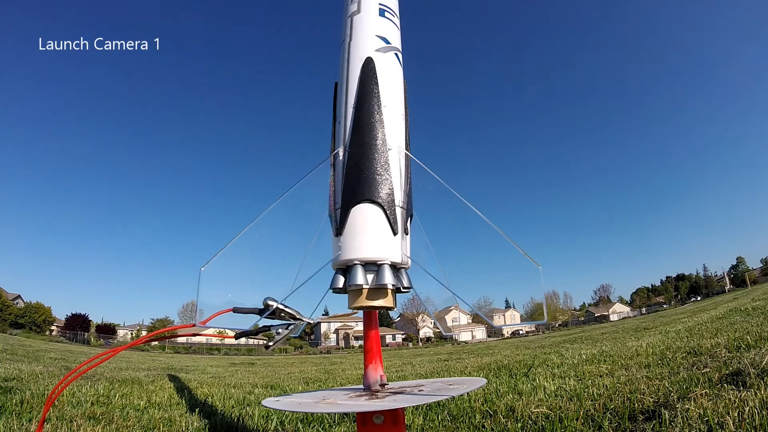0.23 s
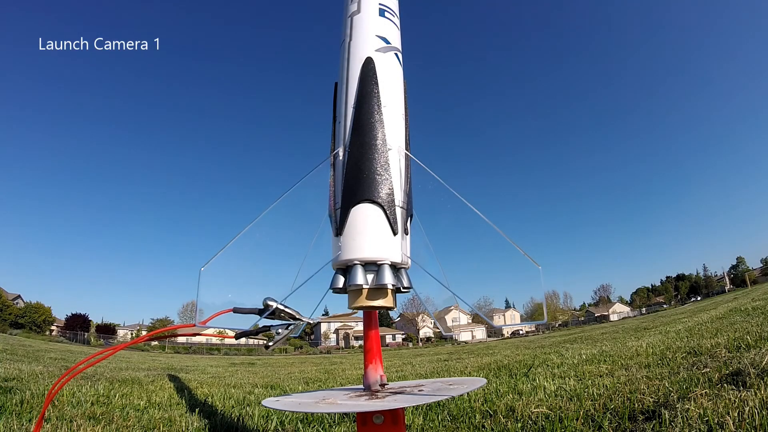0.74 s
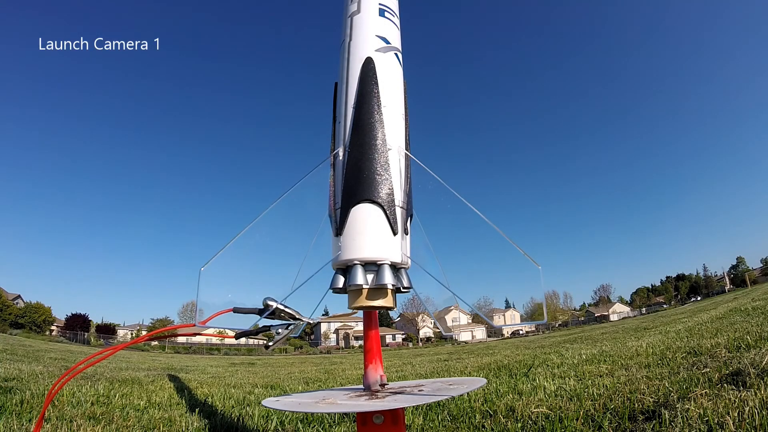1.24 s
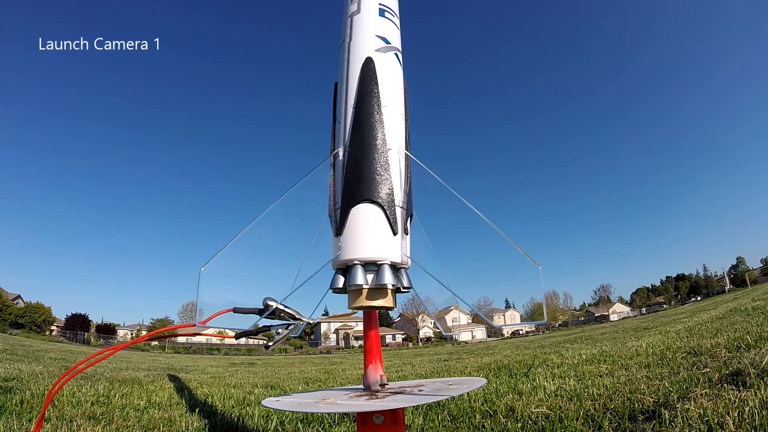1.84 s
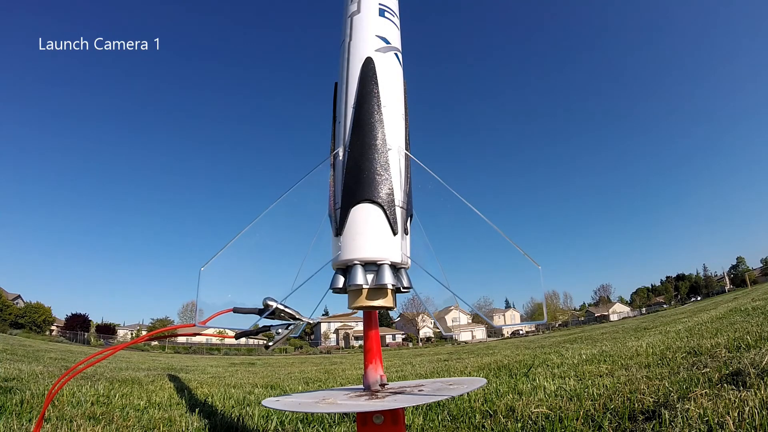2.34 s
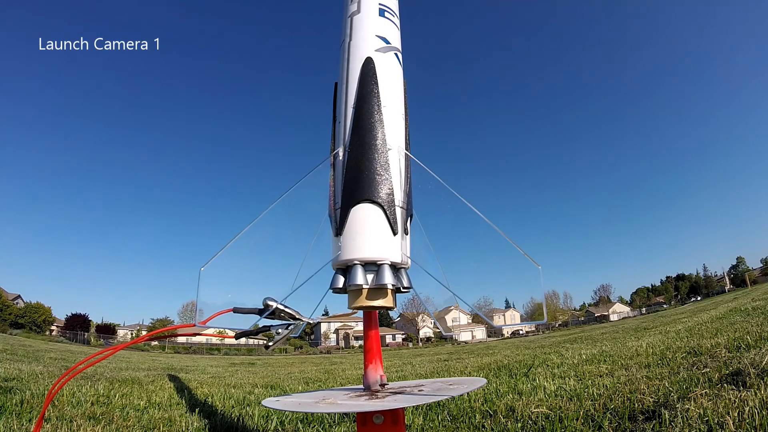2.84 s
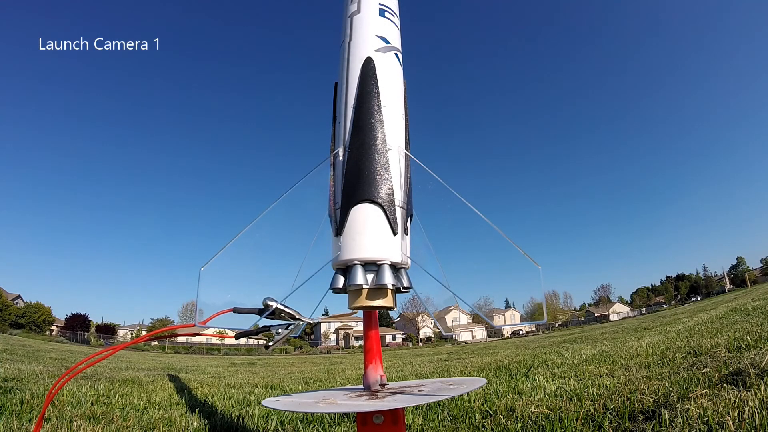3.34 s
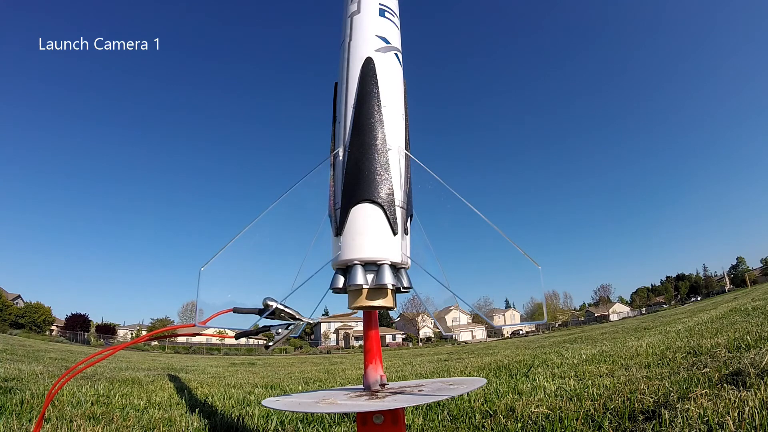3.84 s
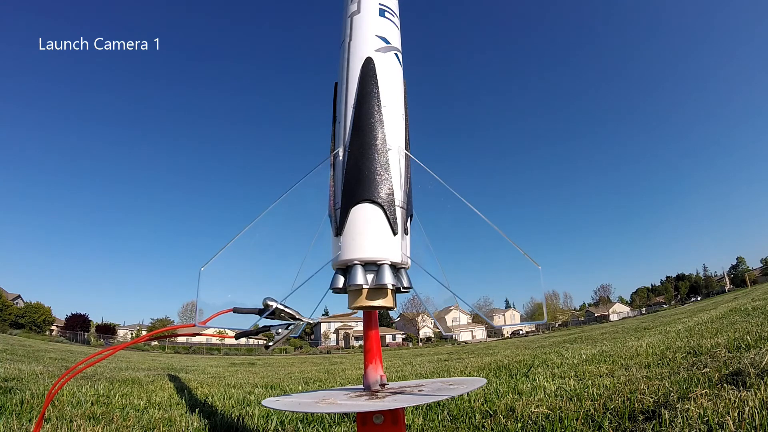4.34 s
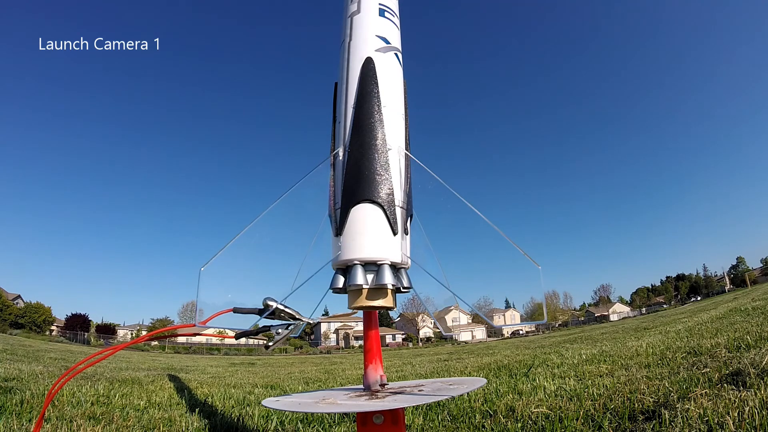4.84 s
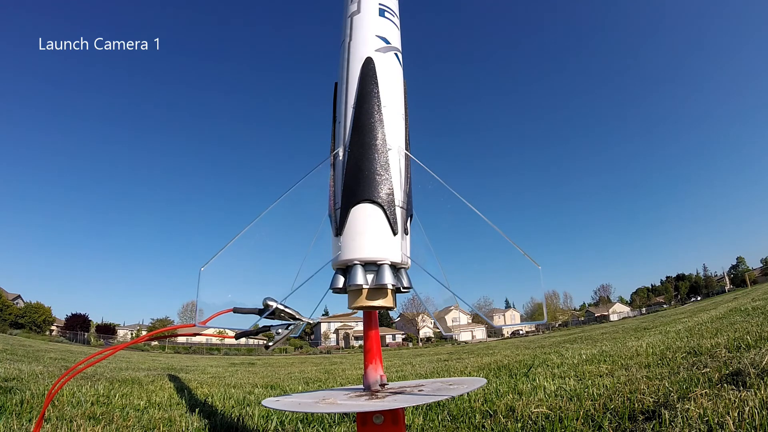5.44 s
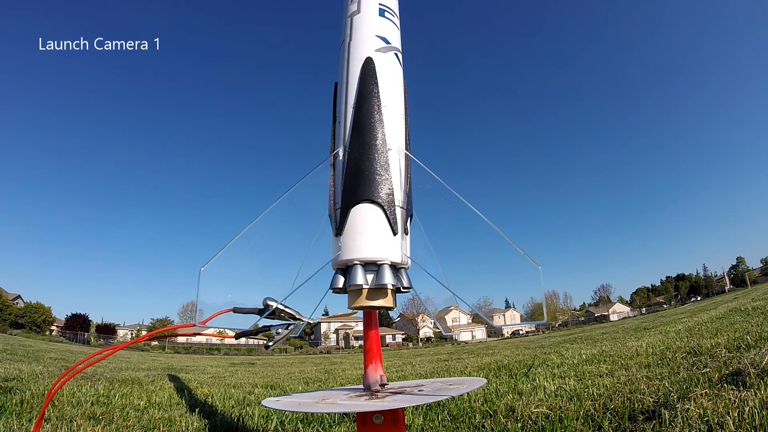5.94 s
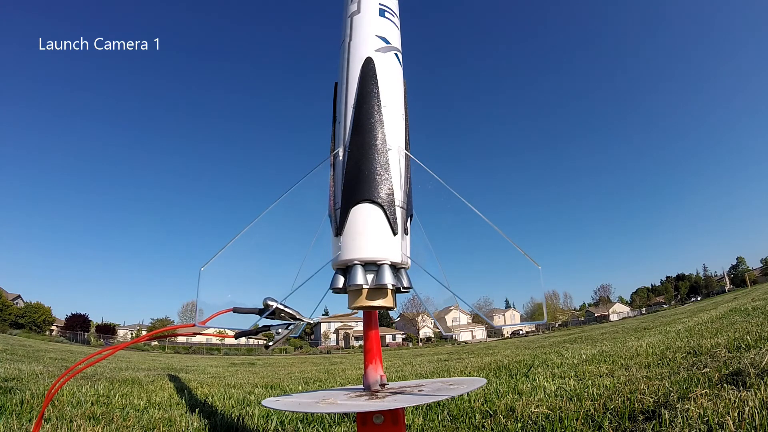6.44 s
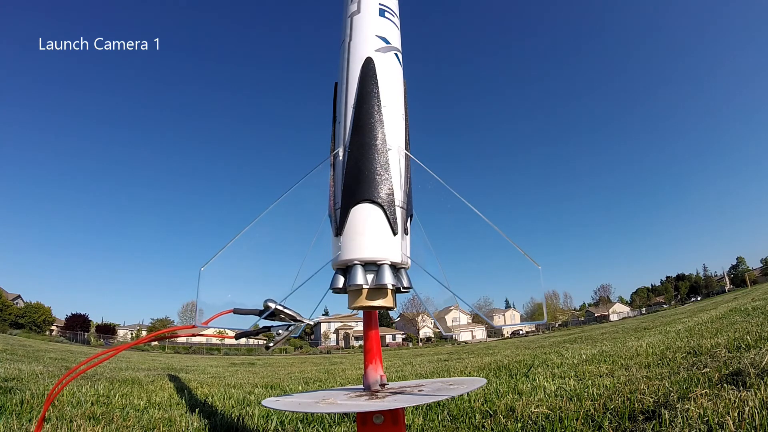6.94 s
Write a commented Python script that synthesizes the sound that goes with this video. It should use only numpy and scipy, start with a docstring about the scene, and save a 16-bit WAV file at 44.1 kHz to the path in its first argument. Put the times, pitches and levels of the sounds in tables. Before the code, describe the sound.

A quiet, steady low town rumble and a faint high hiss fill a park throughout. From about 0.7 seconds a small bird nearby whistles a high two-part song once a second, six times in all: a short arched note, then a falling warble or slur, with the last two songs louder. Farther birds give soft, slightly echoing chirps all along, with a few lilting notes between 2.3 and 3.6 seconds and three rising buzzes between 4.2 and 5.9 seconds. Just before 6 seconds a model rocket's igniter starts to fizz faintly, then catches. Its bright sizzle swells to a peak around 6.5 seconds, louder than the birds. Sharp spits of sparks, the loudest sounds, cluster between 6.5 and 6.9 seconds, while the sizzle thins to a grainy sputter that keeps spitting until the end, just after 7 seconds.

```python
"""A low town rumble and a faint hiss lie behind small birds in a park, where a model rocket waits on its pad.
A near bird whistles a two-part song about once a second; farther ones chirp and buzz among the trees.
Each call is a near-pure tone, modulated in pitch and level. At about six seconds the igniter catches:
sparks, each an impulse ringing between nozzle and pad, merge into a sizzle that swells and then
thins out among sharp spits. One microphone hears it all."""
import sys
import numpy as np
from scipy import signal
from scipy.fft import rfft, irfft
from scipy.io import wavfile
from scipy.ndimage import uniform_filter1d

SR = 44100
rng = np.random.default_rng(int(sys.argv[2]) if len(sys.argv) > 2 else 0)


def bounce(signal):
    """Save signal as a 16-bit WAV file at the path given by the first command-line argument."""
    frames = np.transpose(np.atleast_2d(signal))
    limited = np.clip(frames, -1, 1)
    pcm = np.round(limited * 32767).astype(np.int16)
    wavfile.write(sys.argv[1], SR, pcm)


N = 316638
TIME = np.arange(N) / SR
CATCH_S, SMOULDER_S = 6.023, .17   # when the igniter catches; how long it fizzes beforehand


def from_db(db):
    """Amplitude grows tenfold for every 20 decibels."""
    return 10 ** (np.asarray(db) / 20)


def rms_one(x):
    """Dividing by the root mean square gives unit power."""
    return x / np.sqrt(np.mean(x ** 2) + 1e-20)


def add(out, start_s, sound):
    """Superposition: a sound adds to the mix from its starting time."""
    at = max(round(start_s * SR), 0)
    out[at:at + len(sound)] += sound[:max(N - at, 0)]


def drift(corner_hz):
    """Low-passed noise wanders at random with an rms of one."""
    hz = np.arange(N // 2 + 1) * SR / N
    return rms_one(irfft(rfft(rng.standard_normal(N)) / (1 + (hz / corner_hz) ** 2), N))


def coloured_noise(spectrum):
    """Spectral shaping: white noise takes the given contour, rolling off past both ends; rms one."""
    hz = np.arange(1, N // 2 + 2) * SR / N
    knots_hz, level_db = np.transpose(spectrum)
    roll_off = np.minimum(hz / knots_hz[0], 1) ** 2 * np.minimum(knots_hz[-1] / hz, 1) ** 2
    gain = roll_off * from_db(np.interp(np.log(hz), np.log(knots_hz), level_db))
    return rms_one(irfft(rfft(rng.standard_normal(N)) * gain, N))


def background(settled_db=-50, ease_db=1, ease_s=1.1, hiss_db=-62.5, hum_waver_db=2, wander_rad=.45):
    """Broadband rumble and hiss lie under two machine hums, slowly modulated in level and phase."""
    # spectrum of the town rumble: frequency_hz, relative_density_db
    rumble = [(20, -24), (32, -21.5), (48, -25), (80, -27.5), (108, -26.5), (122, -21.5), (138, -2.5),
              (160, -0.5), (205, -4.5), (300, -11), (430, -17), (800, -21), (2500, -28.5), (4200, -41)]
    # spectrum of the high hiss in the air: frequency_hz, relative_density_db
    air = [(3000, -22), (4500, -15.5), (5900, -6), (6400, 2.5), (8500, 1.5), (10000, -1.5), (11500, -6),
           (15000, -11)]
    # tones of distant machinery: pitch_hz, rms_db
    hums = [(60, -77), (484, -74.5)]
    rumble_db = settled_db + ease_db * np.exp(-TIME / ease_s)
    out = from_db(rumble_db) * coloured_noise(rumble) + from_db(hiss_db) * coloured_noise(air)
    for hz, rms_db in hums:
        phase = 2 * np.pi * hz * TIME + wander_rad * drift(2.2)
        out += np.sqrt(2) * from_db(rms_db + hum_waver_db * drift(2.9)) * np.sin(phase)
    return out


def park(x, wet_db, t60_s):
    """Reverberation: trees and houses scatter sound into a thin, exponentially decaying tail."""
    t = TIME[:SR // 2]
    echoes = rng.standard_normal(len(t)) * from_db(-60 * t / t60_s) * (t > .01)
    return x + from_db(wet_db) * signal.fftconvolve(x, echoes / np.linalg.norm(echoes))[:N]


def whistle(hz, level_db, waver, flicker_db=1.2):
    """A bird's near-pure tone: phase is the integral of frequency, and pitch and level waver a little."""
    jitter, flicker = (rms_one(uniform_filter1d(row, 330)) for row in rng.standard_normal((2, len(hz))))
    phase = 2 * np.pi * np.cumsum(hz * (1 + waver * jitter)) / SR
    envelope = from_db(level_db + flicker_db * flicker) * signal.windows.tukey(len(hz), .1)
    return np.sqrt(2) * envelope * np.sin(phase)


def sing(shape, notes, waver, scallops_per_s=0, dip_db=0):
    """Notes share one contour; in a warble, modulation bends the pitch in arcs with level dips between."""
    out = np.zeros(N)
    length_share, *columns = np.transpose(shape)
    for start_s, length_s, level_db in notes:
        t = np.arange(round(length_s * SR)) / SR
        hz, shape_db, depth_hz = (np.interp(t / length_s, length_share, column) for column in columns)
        trough = 1 - np.abs(np.sin(np.pi * scallops_per_s * t))
        add(out, start_s, whistle(hz - depth_hz * trough, level_db + shape_db - dip_db * trough, waver))
    return out


def chirps(edge_db=9):
    """Frequency glides: each short call follows a parabola in pitch and is loudest in the middle."""
    # single chirps: start_s, length_s, first_hz, middle_hz, last_hz, level_db
    calls = [(0.191, 0.024, 2520, 2360, 2400, -61), (.407, 0.045, 3230, 2610, 3080, -59),
             (0.486, 0.027, 2610, 2700, 2900, -64), (0.578, 0.033, 2610, 2130, 2100, -61),
             (.798, .027, 3030, 2700, 2400, -60.5), (.98, 0.047, 2660, 2290, 2150, -65),
             (1.175, 0.032, 3100, 2550, 2560, -62), (1.445, .04, 2320, 2210, 2220, -66),
             (1.448, .05, 3700, 4300, 3900, -75), (1.478, .025, 3650, 3480, 3250, -70),
             (1.691, 0.053, 2130, 2075, 2150, -66), (2.068, .018, 3400, 4600, 6200, -69),
             (2.819, .039, 3210, 2870, 2590, -61), (2.933, 0.037, 3990, 3580, 3400, -66),
             (4.168, .064, 3530, 3460, 3310, -61), (4.439, 0.087, 4550, 3910, 3360, -57.5),
             (4.53, .06, 4200, 3900, 3750, -73), (4.888, .053, 2730, 2255, 2380, -61.5),
             (5.47, .062, 2600, 2300, 2390, -58.5), (5.987, 0.096, 2360, 2500, 2700, -64),
             (6.152, 0.034, 3210, 2750, 2030, -60), (6.514, 0.091, 2480, 2600, 2720, -64)]
    out = np.zeros(N)
    for start_s, length_s, *pitches_hz, level_db in calls:
        position = np.linspace(-1, 1, round(length_s * SR))
        hz = np.polyval(np.polyfit([-1, 0, 1], pitches_hz, 2), position)
        add(out, start_s, whistle(hz, level_db - edge_db * position ** 2, waver=.012, flicker_db=3))
    return out


def buzzes(gap_db=19, scatter=.028, uneven_db=2, base_s=.0115, sweep_hz_per_s=105000, first_share=.204):
    """Sawtooth frequency modulation: downward flicks climb and swell, coming slower as they widen."""
    # buzzing climbs: start_s, length_s, first_hz, last_hz, final_db, swell_db, final_sweep_hz
    climbs = [(4.245, 0.2, 4120, 4880, -58.5, 12, 497), (4.944, 0.27, 2466, 3830, -57, 5.5, 1150),
              (5.564, .29, 2660, 4150, -57, 5, 1110)]
    out = np.zeros(N)
    for start_s, length_s, first_hz, last_hz, final_db, swell_db, final_sweep_hz in climbs:
        progress = np.linspace(0, 1, round(length_s * SR))
        centre_hz = first_hz + (last_hz - first_hz) * np.sin(np.pi * progress / 2) ** 2
        sweep_hz = final_sweep_hz * (first_share + (1 - first_share) * progress)
        period_s = base_s + sweep_hz / sweep_hz_per_s
        flick, within = np.divmod(np.cumsum(1 / period_s) / SR, 1)
        detune, accent = rng.standard_normal((64, 2))[flick.astype(int)].T
        hz = centre_hz * (1 + scatter * detune) + sweep_hz * (.5 - within)
        crest_db = final_db - swell_db * (1 - progress) + uneven_db * accent
        add(out, start_s, whistle(hz, crest_db - gap_db * np.cos(np.pi * within) ** 2, waver=.0145))
    return out


def far_birds():
    """Distance raises the share of reverberant sound in the lilts, chirps and buzzes."""
    # a rising and falling note: length_share, pitch_hz, relative_db, scallop_depth_hz
    lilt = [(0, 2386, -8, 0), (.27, 2520, -2.5, 0.004), (.45, 3040, -5, 0), (.74, 3450, -6, 0),
            (1, 2660, -6, 0)]
    # its repeats: start_s, length_s, level_db
    lilts = [(2.306, 0.12, -61), (2.729, 0.11, -63), (2.955, 0.12, -60.5), (3.21, .125, -62.5),
             (3.491, 0.12, -65)]
    return park(sing(lilt, lilts, waver=.019) + chirps() + buzzes(), wet_db=-11, t60_s=.42)


def near_bird(arch_s=.062, answer_after_s=.11):
    """Direct sound dominates at close range: an arched note, then a slurred or warbled answer."""
    # three note contours: length_share, pitch_hz, relative_db, scallop_depth_hz
    arch = [(0, 4300, -18, 0), (.13, 4950, -5, 0), (.36, 5500, -9, 0), (.66, 5800, -4, 0),
            (.83, 5300, -3.5, 0), (1, 4200, -8, 0.002)]   # the opening note
    slur = [(0, 5450, -16, 0), (.12, 6100, -7, 0), (.17, 5500, -7, 0), (.26, 4930, 2, 0),
            (.45, 4790, -5, 0), (.69, 4800, -7, 0), (.86, 4600, -5.5, 0), (1, 3970, -22, 0)]   # the smooth answer
    warble = [(0, 5350, -16, 1298), (.075, 5400, -16, 1300), (.14, 5400, -6, 1407), (.215, 5350, -7, 1150),
              (.35, 5050, -4, 750), (.485, 4820, -5, 400), (.625, 4570, -5, 260), (.825, 4200, -11.5, 100),
              (1, 4070, -18, 0)]   # the falling, scalloped answer
    # the songs: start_s, arch_db, answer_kind, answer_length_s, answer_db
    songs = [(.706, -58.5, "warble", 0.17, -58.5), (1.723, -60.5, "slur", 0.17, -64.5),
             (2.764, -59.5, "warble", .2, -54), (3.823, -59, "warble", .21, -54),
             (4.788, -52.5, "slur", .208, -55), (5.738, -50.5, "warble", 0.15, -50.5)]
    notes = {"arch": [], "slur": [], "warble": []}
    for start_s, arch_db, answer_kind, answer_length_s, answer_db in songs:
        notes["arch"].append((start_s, arch_s, arch_db))
        notes[answer_kind].append((start_s + answer_after_s, answer_length_s, answer_db))
    song = sing(arch, notes["arch"], waver=.0034) + sing(slur, notes["slur"], waver=.003)
    song += sing(warble, notes["warble"], waver=.0059, scallops_per_s=36.8, dip_db=7.5)
    return park(song, wet_db=-19, t60_s=.3)


def resonate(x, hz, width_hz, boost_db):
    """A second-order resonance or antiresonance raises or lowers one band."""
    cosine = np.cos(2 * np.pi * hz / SR)
    width, gain = np.pi * width_hz / SR, from_db(boost_db / 2)
    zeros = [1 + width * gain, -2 * cosine, 1 - width * gain]
    poles = [1 + width / gain, -2 * cosine, 1 - width / gain]
    return signal.lfilter(zeros, poles, x)


def nozzle(clicks, band_hz=(2600, 9000)):
    """Source and filter: every spark excites the same resonances and rings for a few cycles."""
    # peaks and dips of the space between nozzle and pad: centre_hz, width_hz, boost_db
    resonances = [(2680, 1100, 3.5), (3430, 600, -5.5), (4680, 1240, 13), (5500, 1000, 11), (6180, 550, 6),
                  (8200, 1300, 2.5), (9700, 550, -14), (10900, 980, 7), (12900, 1100, 1)]
    ringing = signal.sosfilt(signal.butter(2, band_hz, "band", fs=SR, output="sos"), clicks + 1e-18)
    for centre_hz, width_hz, boost_db in resonances:
        ringing = resonate(ringing, centre_hz, width_hz, boost_db)
    return ringing


def burn(rise_s=.019, peak_at_s=6.48, hold_s=.19, sink_s=.098):
    """The envelope of combustion: a flare builds, holds, then sinks to fewer and less even sparks."""
    stages_s = [CATCH_S - SMOULDER_S, CATCH_S, CATCH_S + rise_s, peak_at_s]
    sinking_s = [peak_at_s + hold_s, peak_at_s + hold_s + sink_s]
    # first fizz, full smoulder, caught, peak, end of hold, sputter
    level_db = np.interp(TIME, stages_s + sinking_s, [-72.5, -62.5, -56, -44, -44, -50.5])
    sparks_per_s = np.interp(TIME, sinking_s, [3200, 1250])
    spread_db = np.interp(TIME, sinking_s, [4, 5])
    return level_db, sparks_per_s, spread_db


def sizzle(flutter_db=.5, flutter_hz=50):
    """Shot noise: thousands of tiny sparks a second merge into a hiss, grainier as they thin out."""
    level_db, sparks_per_s, spread_db = burn()
    born = rng.random(N) < sparks_per_s / SR
    size_db = spread_db * np.minimum(rng.exponential(1, N), 3.3) + flutter_db * drift(flutter_hz)
    sparks = nozzle(born * from_db(size_db) * rng.choice([-1, 1], N))
    running_rms = np.sqrt(np.abs(uniform_filter1d(sparks ** 2, size=3000)) + 1e-12)
    return sparks / running_rms * from_db(level_db) * (TIME > CATCH_S - SMOULDER_S)


def spits(ring_hz=5150, scatter_hz=250):
    """Each large spark sounds the nozzle's impulse response, with a slightly different ring of its own."""
    # the biggest sparks: start_s, relative_peak_db
    sparks = [(6.11, -32), (6.4712, -33), (6.498, -26), (6.5213, -21.5), (6.6149, -25), (6.633, -23.5),
              (6.6944, -26), (6.761, -17.5), (6.8063, -22.5), (6.8265, -21), (6.858, -21), (6.8841, -26),
              (6.911, -31), (6.9202, -35), (7.0277, -33), (7.0566, -27), (7.076, -27), (7.1178, -26),
              (7.1462, -35)]
    out = np.zeros(N)
    snap = nozzle(signal.unit_impulse(SR // 20))
    for start_s, peak_db in sparks:
        spit = resonate(snap, ring_hz + scatter_hz * rng.standard_normal(), width_hz=1100, boost_db=4)
        add(out, start_s, from_db(peak_db) * spit / np.abs(spit).max())
    return out


def igniter(spits_gain_db=-1.5):
    """Combustion noise: the burning tip gives a dense sizzle and separate spits."""
    return sizzle() + from_db(spits_gain_db) * spits()


def scene():
    """The sources superpose at one microphone, which feeds both channels."""
    return np.tile(background() + near_bird() + far_birds() + igniter(), (2, 1))


def record(dry, cutoff_hz=15350):
    """Band limiting: a steep elliptic low-pass removes the highest treble."""
    return signal.sosfilt(signal.ellip(12, .1, 80, cutoff_hz, fs=SR, output="sos"), dry)


dry = scene()
out = record(dry)
bounce(out)
```